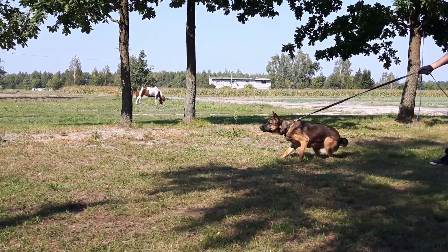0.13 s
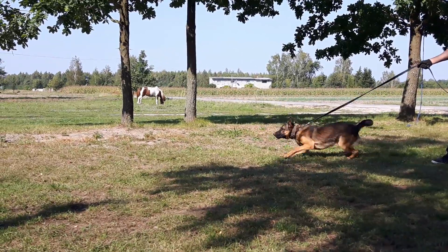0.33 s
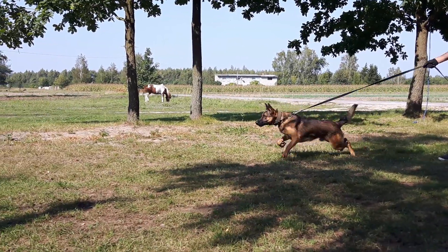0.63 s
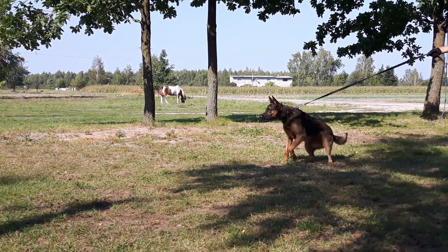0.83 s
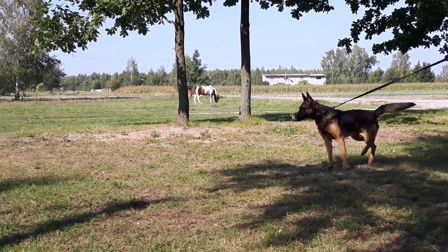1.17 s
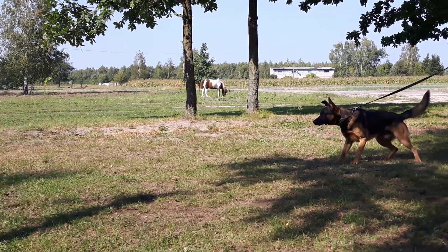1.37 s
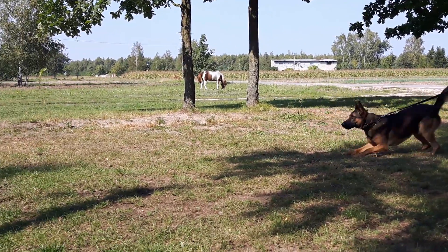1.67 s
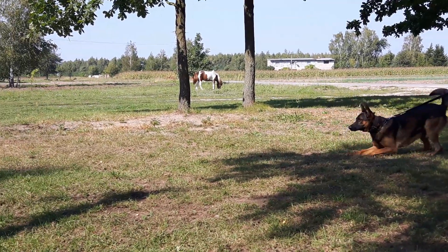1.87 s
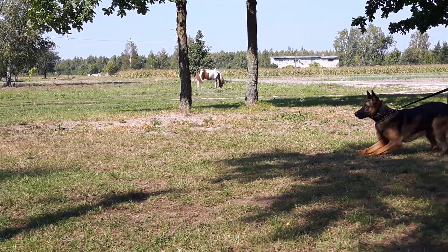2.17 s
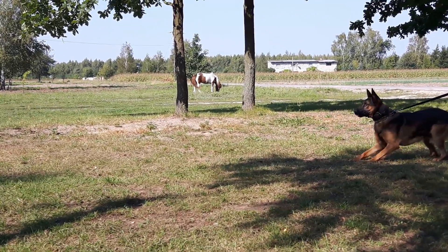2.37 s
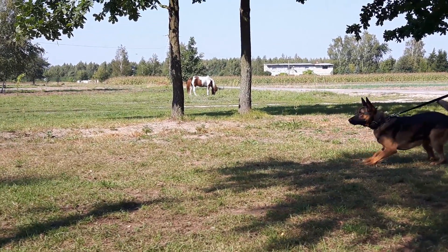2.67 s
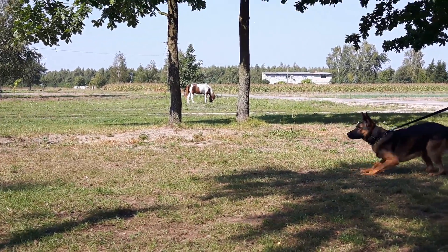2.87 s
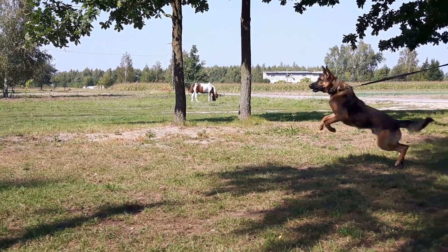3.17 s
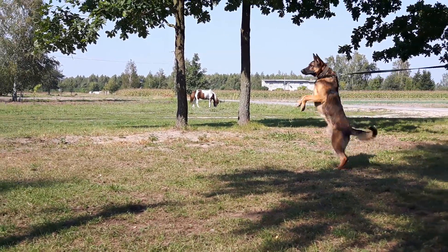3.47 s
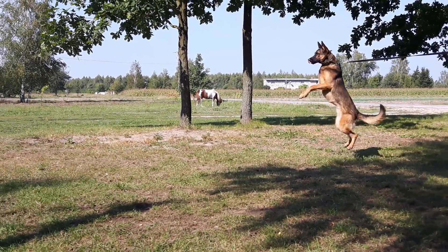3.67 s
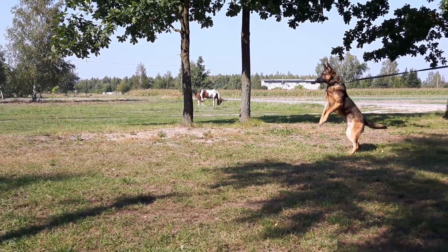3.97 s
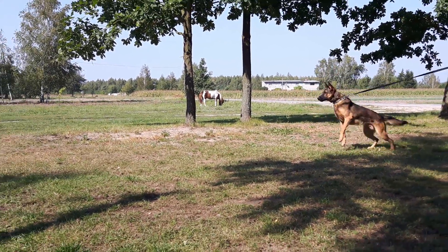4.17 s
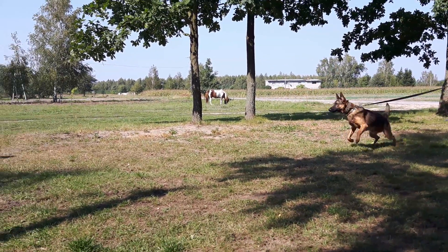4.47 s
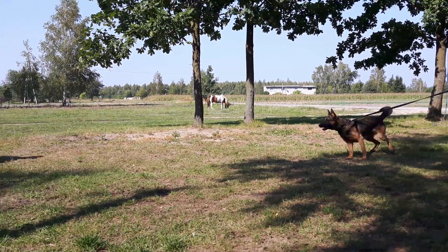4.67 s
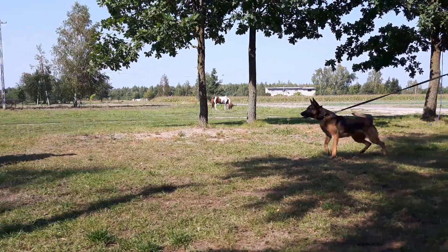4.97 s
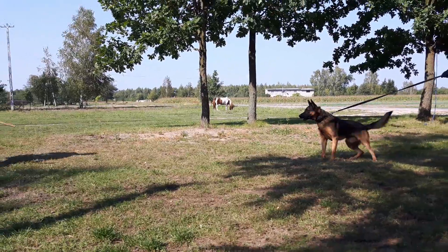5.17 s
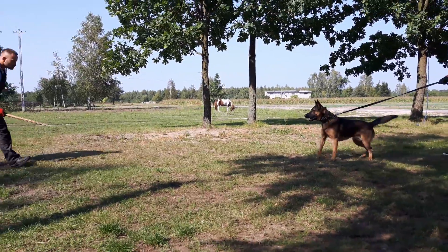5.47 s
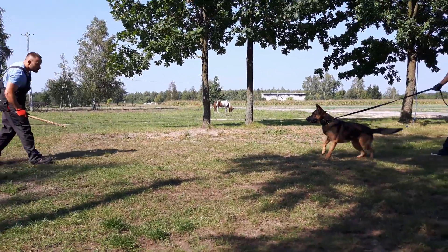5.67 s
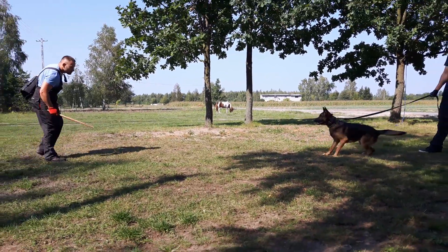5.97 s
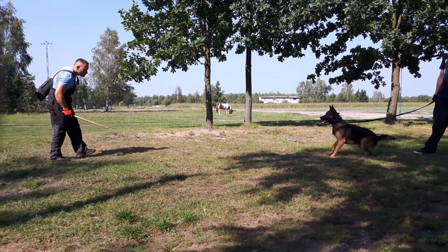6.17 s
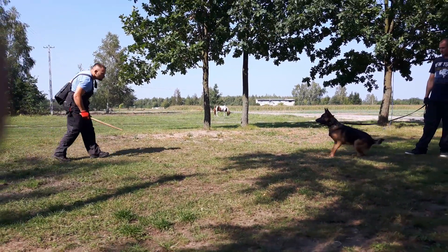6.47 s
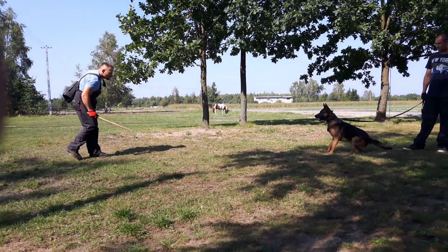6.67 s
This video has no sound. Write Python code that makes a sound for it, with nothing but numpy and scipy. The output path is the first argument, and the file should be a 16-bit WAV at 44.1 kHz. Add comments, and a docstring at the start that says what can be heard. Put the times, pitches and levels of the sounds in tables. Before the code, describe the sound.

From the start a dog whines in short, high, almost pure cries that arch up and down in pitch, each with a faint smeared echo from nearby trees. During the first second the cries crowd and overlap, as if from two dogs. They then thin out to about three a second, with stronger ones near 1.1, 3.4, 3.9 and 4.2 seconds. Wind rumbles on the microphone throughout, above a soft hiss of open field and leaves. Puffs of wind land as sharp low thumps, louder than the dog: one at 0.5 seconds, a quick cluster from 1.2 to 1.4, several between 1.9 and 2.5, and another near 3.3. The hardest comes just after 5 seconds, with a few more until about 5.8. The whining continues to the end, with clear cries near 5.6 and 6.7 seconds and fainter ones between them.

```python
"""An open field hisses and rustles while wind rumbles on the microphone. From the start there is dog
whining: short arched cries, nearly pure vocal fold tones, each with a smeared echo off a tree line.
At first several cries overlap, as if from two dogs; after a second they thin out to about three a second.
Meanwhile wind puffs push on the microphone port and ring as low thumps, the hardest just after five
seconds. The whining goes on to the end, with fainter cries between the last strong ones."""
import sys
import numpy as np
from scipy import signal
from scipy.fft import rfft, irfft
from scipy.io import wavfile
from scipy.ndimage import uniform_filter1d, minimum_filter1d

SR = 44100
rng = np.random.default_rng(int(sys.argv[2]) if len(sys.argv) > 2 else 0)


def master_out(mix):
    """Clip the mix to full scale and print it as 16-bit PCM to the path in sys.argv[1]."""
    frames = np.transpose(np.atleast_2d(mix))
    ceiling = np.clip(frames, -1, 1)
    pcm = np.round(ceiling * 32767).astype(np.int16)
    wavfile.write(sys.argv[1], SR, pcm)


N = 300321

# Tone colour of the field bed. Each row: frequency in Hz, relative level in dB.
FIELD_COLOUR = [(180, -34), (300, -4), (440, -9), (700, -9), (1280, -12), (5340, -32.5), (10400, -35.5),
                (15000, -33), (16000, -41)]
# Gusts riding the rumble. Each row: time in seconds, level in dB.
GUSTS = [(0.0, -40.5), (0.83, -42), (1.06, -42), (1.21, -32.5), (1.38, -38), (1.61, -36.5), (2.26, -40.5),
         (2.56, -43.5), (2.73, -42), (3.02, -35.5), (3.2, -39), (4.0, -40), (4.4, -38), (5.39, -37.5),
         (6.71, -43), (6.81, -46)]
# Wind puffs on the microphone. Each row: start in seconds, peak in dB, eddy size as a nominal length in ms.
WIND_PUFFS = [(0.512, -5.5, 0.45), (1.179, -5.5, 0.41), (1.234, -10, 0.49), (1.268, -6.5, 0.53),
              (1.302, -6, 0.47), (1.367, -7, 0.48), (1.541, -29, 0.69), (1.672, -27, 0.9),
              (1.806, -23.5, 0.54), (1.908, -8.5, 0.77), (1.932, -14, 0.52), (2.081, -26.5, 0.99),
              (2.248, -12, 0.66), (2.327, -25.5, 0.85), (2.353, -28, 0.39), (2.388, -24.5, 1),
              (2.44, -10.5, 0.63), (2.812, -28.5, 0.54), (2.992, -23.5, 0.49), (3.25, -6.5, 0.53),
              (3.405, -29, 1), (3.505, -27, 1), (3.6, -24, 1), (3.899, -26.5, 1), (3.999, -31, 0.75),
              (4.378, -31, 0.69), (4.461, -28, 0.93), (4.545, -32.5, 0.54), (4.623, -35.5, 0.077),
              (4.777, -15.5, 0.32), (5.152, 0.5, 0.9), (5.472, -10, 0.67), (5.73, -5.5, 0.38),
              (5.805, -10.5, 0.56), (5.861, -28, 0.73), (6.194, -29, 0.79)]
# Reflections off the tree line. Each row: delay in seconds, level in dB, smear time in seconds.
TREE_ECHOES = [(0.024, -15, 0.014), (0.053, -14.5, 0.0098), (.07, -23, .02)]
# Mouth colour on the lowest two partials. Each row: frequency in Hz, gain in dB.
MOUTH_COLOUR = [(400, -2.5), (750, 2), (1000, 4), (1300, 3.5), (1600, -2.5), (2000, 2.5), (2300, 0),
                (2550, -6), (2680, -12), (3000, -14.5)]
# Throat colour on the upper partials. Each row: frequency in Hz, gain in dB.
THROAT_COLOUR = [(2000, -1.5), (3000, -18), (3900, -23), (4700, -37.5), (5400, -28.5), (7000, -38.5),
                 (8200, -55)]
# Strain in the throat. Each row: time in seconds, gain of the upper partials in dB.
THROAT_STRAIN = [(0, -24), (.26, -20), (.31, -8), (.36, -9), (.375, -25.5), (.49, -8), (.52, -5.5),
                 (.575, -14.5), (.59, -26), (6.8, -26.5)]
# Whining dog cries. Each row: time of the pitch turn in seconds, time before and after it in ms,
# pitch at start, turn and end in Hz, fundamental and octave in dB before the mouth colours them,
# swell into the turn in dB, jitter as a share of the pitch.
DOG_CRIES = [ (0.019, 25, 38.6, 1446, 1451, 1150, -49, -59, -1, 0.021),
             (.168, 32, 19, 540, 673, 680, -52.5, -77, 25, .008),
             (0.271, 84, 9.7, 975, 1170, 1144, -65, -53.5, 26, 0.011),
             (.3, 24, 12, 1033, 1262, 1280, -59, -43, 10, 0.0072),
             (.33, 29.6, 23, 1040, 1141, 1226, -57, -45.5, 8, 0.012),
             (.355, 90, 15, 688, 966, 940, -41, -45, 16.5, 0.011),
             (.384, 22, 13.9, 966, 745, 670, -34.5, -56, 7, 0.023),
             (0.389, 39, 30.6, 1145, 1367, 1207, -44, -56, -2, 0.011),
             (0.406, 10, 35, 416, 408, 410, -42, -86, 19, 0.018),
             (.455, 30, 19, 963, 1130, 1290, -61, -54.5, 8, .015),
             (.47, 12, 26, 1252, 1226, 1150, -49, -74, -1, 0.0088),
             (0.518, 41, 27, 1160, 1320, 1107, -43, -66, 1.5, 0.0066),
             (0.559, 28, 26, 1314, 1140, 1340, -56, -40, 29.5, 0.0088),
             (.61, 22.3, 17, 1042, 700, 497, -36.5, -61, 16.5, 0.018),
             (.625, 42, 51, 2000, 2226, 2270, -50.5, -90, 12, 0.012),
             (0.725, 58, 46.4, 1014, 1325, 980, -41, -52, 17, 0.0092),
             (0.999, 43, 25, 819, 1072, 1020, -55.5, -76, 12.5, 0.0089),
             (1.077, 66.5, 51, 965, 1327, 1026, -40, -57.5, 25.5, 0.0046),
             (1.14, 41, 19.3, 442, 480, 480, -54, -87, 4, .035),
             (1.419, 50, 55, 1010, 1300, 1030, -49.5, -55.5, 17, 0.014),
             (1.625, 55, 44, 691, 983, 900, -59.5, -71, 4, 0.018),
             (1.748, 19, 18, 638, 643, 672, -56, -73, 6, 0.043),
             (2.136, 43, 18, 1065, 1110, 1137, -65, -82, 6, 0.0048),
             (2.432, 37, 38, 1255, 1416, 1380, -45, -67, 15, 0.0068),
             (2.737, 41, 45, 1117, 1318, 1190, -53.5, -69, -4, 0.0068),
             (2.85, 38, 13, 1040, 1204, 1270, -76, -69, 6, .008),
             (2.83, 48, 19.6, 621, 716, 805, -57, -61.5, 4, 0.017),
             (2.865, 15, 22, 800, 842, 635, -62, -71, -7, .015),
             (3.059, 46, 52, 1023, 1260, 1124, -51.5, -62, 15, .008),
             (3.35, 52, 62, 1030, 1288, 1030, -41, -60, 30, 0.009),
             (3.664, 36, 51, 1004, 1050, 1057, -70, -73, 12, 0.0073),
             (3.945, 49, 50.5, 1027, 1365, 1100, -45.5, -61, 9.5, 0.0057),
             (4.24, 50, 55, 1015, 1320, 1024, -46, -55, 10, 0.0062),
             (4.54, 27, 13, 570, 660, 765, -58, -62, 8, 0.011),
             (4.575, 20, 66, 1010, 1047, 1030, -71, -62.5, 10, 0.0066),
             (4.839, 13, 14, 640, 643, 627, -58.5, -64.5, 17, 0.03),
             (4.889, 30, 28.4, 1032, 1164, 1030, -55, -62, 15, 0.016),
             (5.038, 18, 17, 549, 574, 610, -59, -79, 10.5, .008),
             (5.2, 130, 120, 1330, 1470, 1310, -68.5, -94.5, 5, 0.041),
             (5.634, 44, 35, 957, 1280, 1124, -46, -71, 34, 0.0041),
             (5.938, 17, 16, 1313, 1204, 1160, -60, -84, 13, 0.006),
             (5.975, 92, 30, 833, 1113, 870, -67, -80, 3, 0.024),
             (6.17, 40, 13, 910, 976, 993, -74, -92, 8, 0.031),
             (6.25, 59, 43, 994, 1180, 1020, -68, -88, 4, 0.011),
             (6.447, 32, 26, 495, 655, 550, -59, -67, -10, 0.02),
             (6.58, 60, 35, 755, 970, 963, -68, -73, 2, 0.021),
             (6.689, 41, 20, 957, 1221, 1270, -50, -67.5, 28, .008),
             (6.714, 28, 38, 1287, 1458, 1050, -53, -70, 5, 0.01), ]

VENT_HZ, AMP_HZ, PORT_DAMPING = 87, 65, 1.506  # bass corners, before eddy size shifts them
ARCH_POWER = 1.8  # 2 would bend the pitch like a parabola around the turn
OCTAVE_FADE_SHARE = .2  # the octave holds its level better than the fundamental
WAVER_SHARE, WAVER_DB = 0.0099, 2.06  # slow waver in pitch and in level


def undb(db):
    """Decibels to gain."""
    return 10 ** (np.asarray(db) / 20)


def level(x, db):
    """Scale to an rms level."""
    return x * undb(db) / np.sqrt(np.mean(x ** 2))


def curve(at, table):
    """Read a breakpoint curve, straight between its points."""
    return np.interp(at, *np.transpose(table))


def walk(rate):
    """Random modulation gliding to a new value rate times a second; spread near 1."""
    hold = int(SR / rate)
    steps = np.repeat(rng.standard_normal(N // hold + 1), hold)
    return 1.3 * uniform_filter1d(steps, hold)[:N]


def field_bed():
    """Leaves, far traffic and amplifier hiss: octave bands that flicker a little, the top steadier."""
    hz = np.fft.rfftfreq(N, 1 / SR) + 1
    colour_hz, colour_db = np.transpose(FIELD_COLOUR)
    colour = undb(np.interp(np.log(hz), np.log(colour_hz), colour_db))
    bed = 0
    for centre in 250 * 2. ** np.arange(7):
        band = np.cos(np.pi / 2 * np.clip(np.log2(hz / centre), -1, 1))
        noise = irfft(rfft(rng.standard_normal(N)) * colour * band, N)
        flicker_db = 1.2 * min(1500 / centre, 1) * walk(12)
        bed = bed + noise * undb(flicker_db)
    return level(bed, db=-63)


def microphone_port(push, tuning):
    """Vent and amplifier cut the bass three times over, turning a push of air into a short ring."""
    for hz in VENT_HZ, VENT_HZ, AMP_HZ:
        corner = 2 * np.pi * hz * tuning
        bass_cut = signal.bilinear([1, 0, 0], [1, PORT_DAMPING * corner, corner ** 2], SR)
        push = signal.lfilter(*bass_cut, push)
    return push


def eddy(size_ms):
    """One eddy heard through the port, peak 1; large ones rise more gently and ring lower."""
    size_ms = max(size_ms, .1)
    softness = 3.72 * min(size_ms / 0.97, 3) ** 0.94
    t_ms = np.arange(SR // 10) / SR * 1000
    age = t_ms / size_ms * softness / 3
    ring = microphone_port(age ** softness * np.exp(-age), tuning=(0.54 / size_ms) ** 0.23)
    top_hz = min(300 / size_ms, 1200)  # no fine detail in a large eddy
    ring = signal.sosfilt(signal.butter(2, top_hz, fs=SR, output="sos"), ring)
    return ring / np.abs(ring).max()


def wind_rumble(per_second=70, spread_db=1.5):
    """Dense weak eddies in five sizes push and pull, blurring into a rumble that rides the gusts."""
    rumble = 0
    for size_ms, db in [(.3, -30), (.5, -12.0), (1.1, 0), (2.6, 1.5), (7.5, -10.5)]:
        arrival, side, strength = rng.random((3, N))
        gain = undb(-spread_db * np.log(strength + 1e-4))
        hits = (arrival < per_second / SR) * np.sign(side - .5) * gain
        rumble = rumble + level(signal.fftconvolve(hits, eddy(size_ms))[:N], db)
    flutter = undb(1.7 * walk(42))
    return level(rumble * flutter, 0) * undb(curve(np.arange(N) / SR, GUSTS))


def wind_thumps(sign_flip_s=5):
    """Strong eddies thump on the microphone, each trailing three weak ones; late ones flip in sign."""
    thumps = np.zeros(N + SR)
    wake = eddy(size_ms=1.24)
    for (start, db, size_ms), spacing in zip(WIND_PUFFS, rng.random((len(WIND_PUFFS), 3))):
        push = undb(db) * (1 if start < sign_flip_s else -1)
        ring = eddy(size_ms) * push
        thumps[int((start + .0022) * SR):][:len(ring)] += ring
        for k, lag in enumerate(np.cumsum(0.0059 + 0.01 * spacing)):
            wake_gain = undb(-19 - 1.4 * k) * size_ms / 1.07  # large eddies shed the stronger wake
            thumps[int((start + .006 + lag) * SR):][:len(wake)] += wake * wake_gain * push
    return thumps[:N]


def tree_echo(sound):
    """Trunks and leaves at slightly different distances throw back a smeared echo."""
    response = np.zeros(SR // 4)
    t = np.arange(SR // 8) / SR
    for delay, db, smear in TREE_ECHOES:
        scatter = rng.standard_normal(len(t)) * np.exp(-t / smear)
        response[int(delay * SR):][:len(t)] += undb(db) * scatter / np.linalg.norm(scatter)
    return signal.fftconvolve(sound, response)[:N]


def cry(row, strain_db, waver, jitter):
    """Nearly pure vocal fold tone arching around its turn; mouth and throat colour the partials."""
    turn, rise_ms, fall_ms, start_hz, turn_hz, end_hz, db, octave_db, swell_db, hoarseness = row
    start, end = max(turn - rise_ms / 1000, 0), turn + fall_ms / 1000
    span = np.arange(int(start * SR), min(int(end * SR), N))
    t = span / SR
    before = t < turn
    from_turn = abs(t - turn) / np.where(before, turn - start, end - turn)  # 1 at either end
    arched = (start_hz - turn_hz) * (end_hz - turn_hz) > 0  # else it slides straight through
    bend = from_turn ** (ARCH_POWER if arched else 1)
    hz = turn_hz + (np.where(before, start_hz, end_hz) - turn_hz) * bend
    unsteady_hz = hz * (1 + WAVER_SHARE * waver[span] + hoarseness * jitter[span])
    phase = 2 * np.pi * np.cumsum(unsteady_hz) / SR
    slack_db = swell_db * from_turn ** 1.6  # most cries push hardest at the turn
    partials_db = [db - slack_db + curve(hz, MOUTH_COLOUR),
                   octave_db - OCTAVE_FADE_SHARE * slack_db + curve(2 * hz, MOUTH_COLOUR)]
    effort_db = np.maximum(*partials_db) + strain_db[span]
    partials_db += [effort_db + curve(k * hz, THROAT_COLOUR) for k in range(3, 10)]
    rasp_db = 1.26 * (jitter[span[::-1]] + 0.6 * waver[span])  # grows with each higher partial
    tone = sum(undb(partial_db + k * rasp_db) * np.sin((k + 1) * phase)
               for k, partial_db in enumerate(partials_db))
    edge = np.clip(np.minimum(t - start, end - t) / .012, 0, 1)  # 12 ms fades
    envelope = np.sin(edge * np.pi / 2) ** 2 * undb(WAVER_DB * waver[span[::-1]])
    return np.bincount(span, np.sqrt(2) * tone * envelope, N)


def dog_whines():
    """Whining dog cries, some overlapping as if from two dogs, brighter where they strain."""
    strain_db = curve(np.arange(N) / SR, THROAT_STRAIN)
    waver, jitter = walk(60), walk(400)  # slow and quick unsteadiness of the folds
    return sum(cry(row, strain_db, waver, jitter) for row in DOG_CRIES)


def scene():
    """Whines, echo, wind and field at one microphone."""
    whines = dog_whines()
    return (whines + tree_echo(whines) + wind_thumps() + wind_rumble() + field_bed())[None]


def record(dry, threshold=.5, top_hz=15750):
    """Gain control ducks for a moment under the loudest thumps; the top is cut."""
    held_peak = -minimum_filter1d(-np.abs(dry), size=1500)
    peak = uniform_filter1d(held_peak, size=600)
    gain = np.minimum(1, (threshold / (peak + 1e-9)) ** 0.27)
    return signal.sosfilt(signal.ellip(10, .2, 60, top_hz, fs=SR, output="sos"), dry * gain)


dry = scene()
out = record(dry)
master_out(out)
```